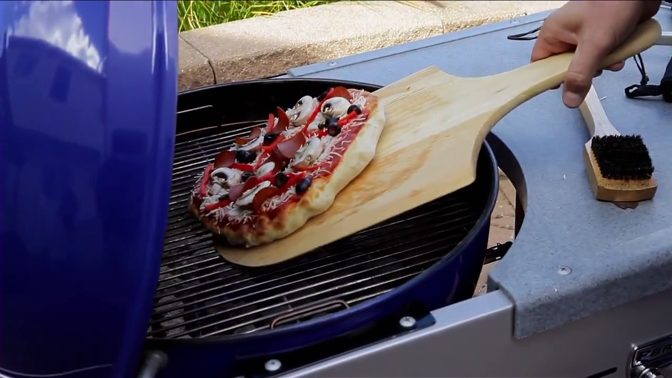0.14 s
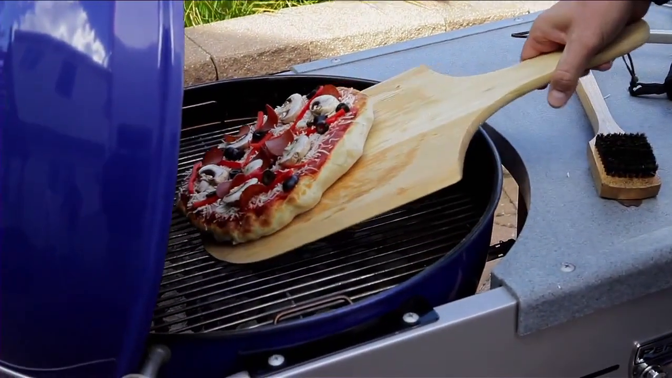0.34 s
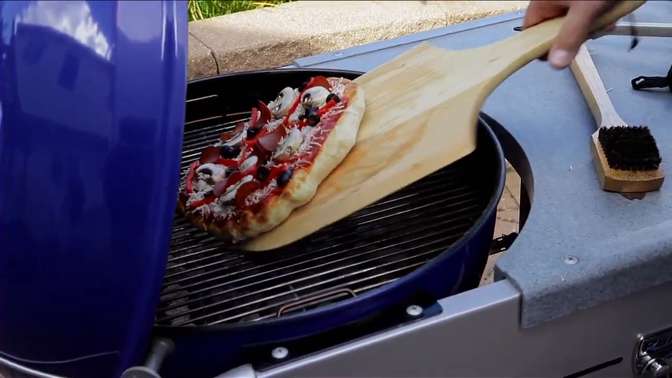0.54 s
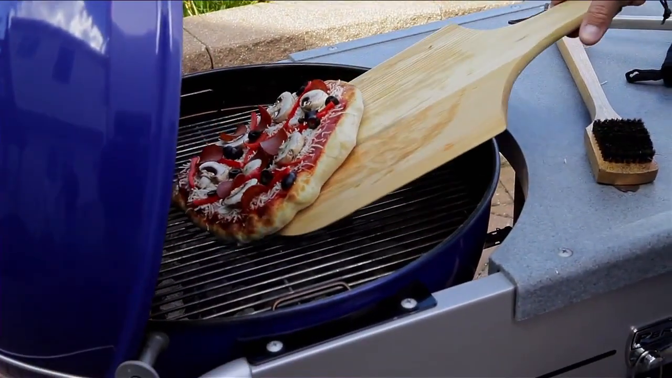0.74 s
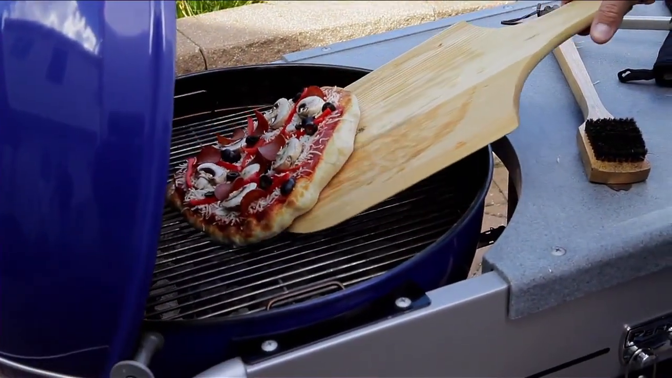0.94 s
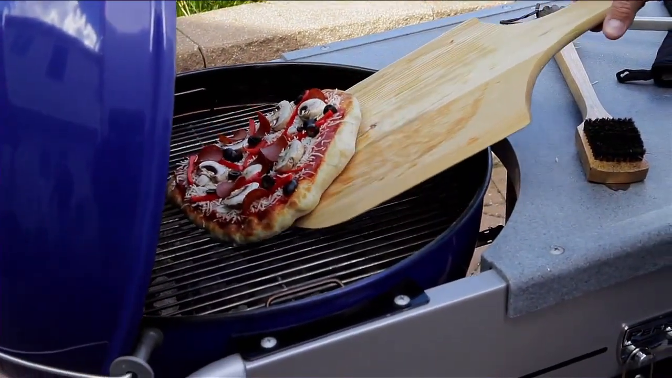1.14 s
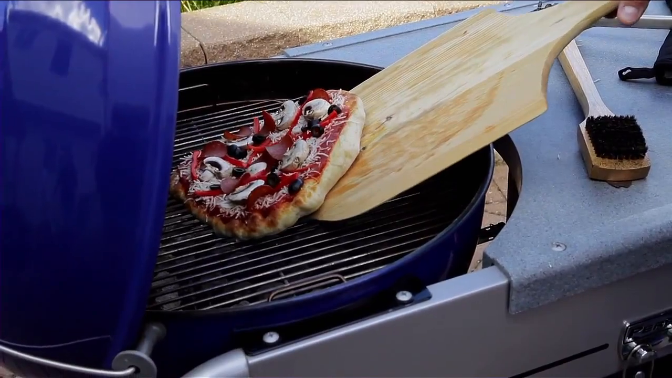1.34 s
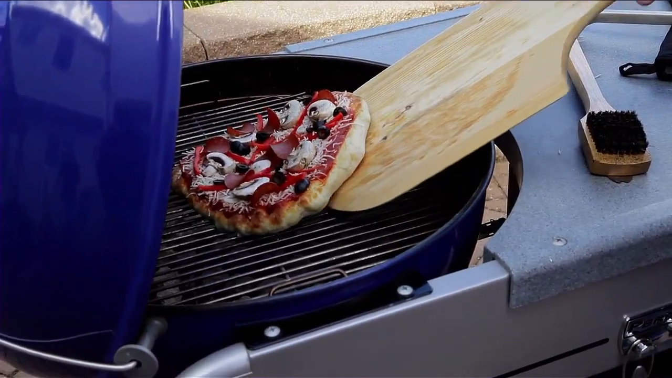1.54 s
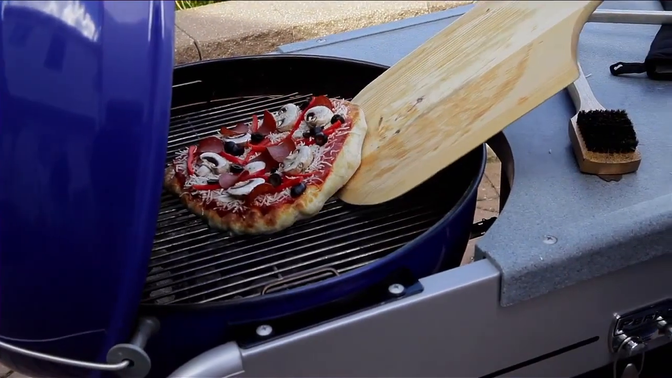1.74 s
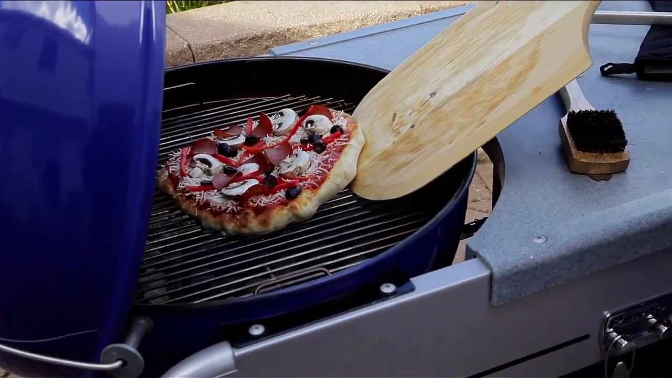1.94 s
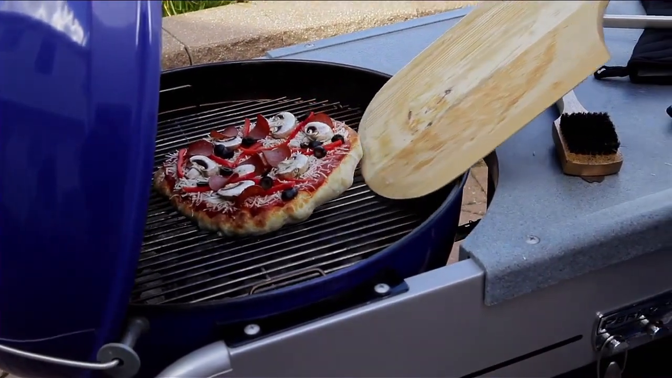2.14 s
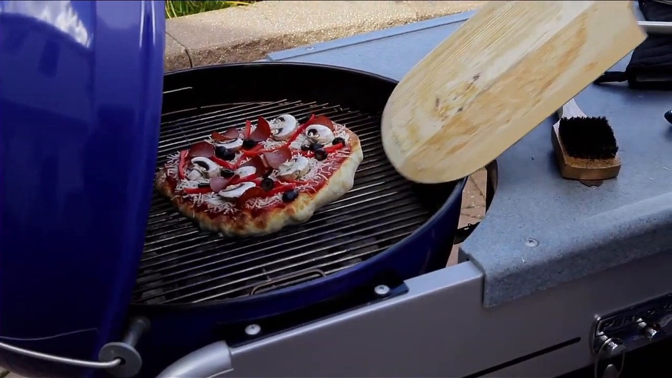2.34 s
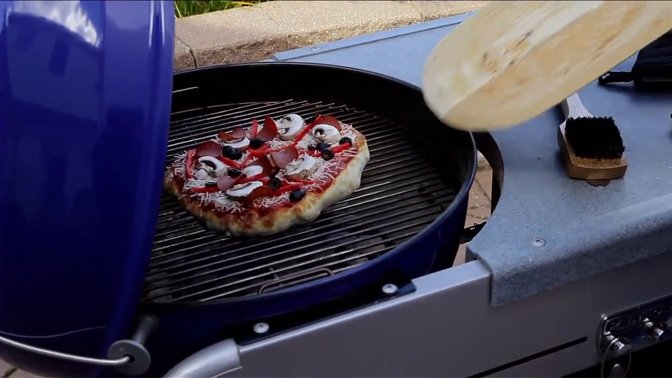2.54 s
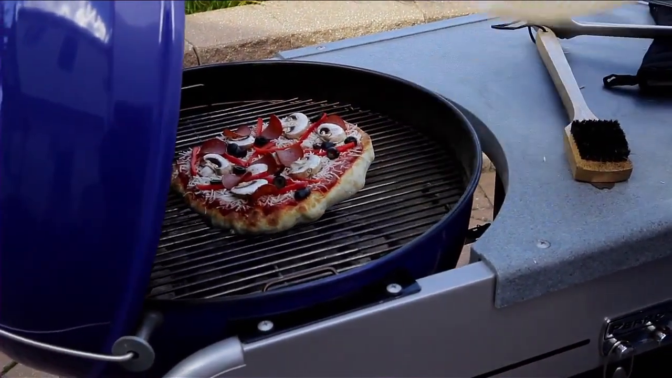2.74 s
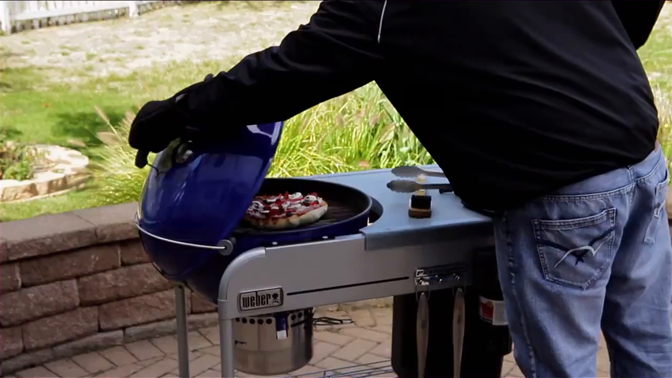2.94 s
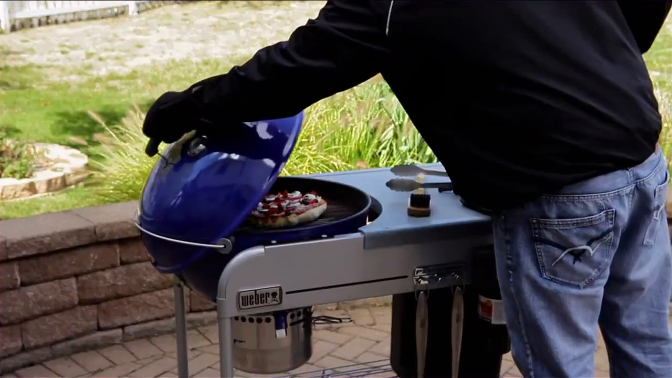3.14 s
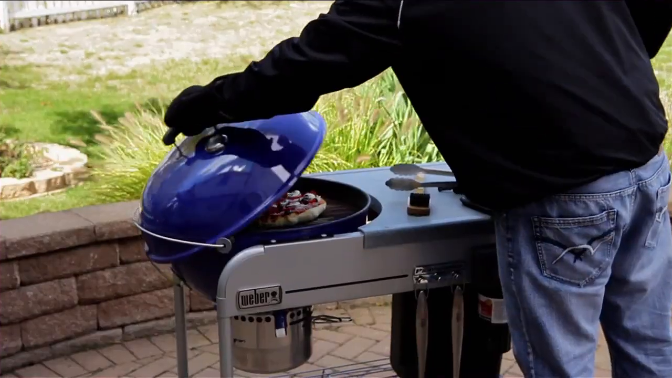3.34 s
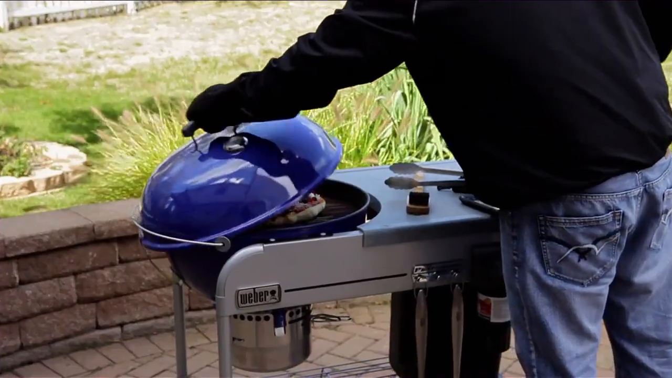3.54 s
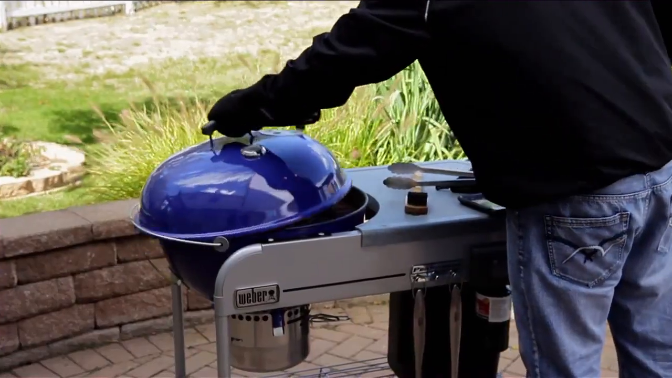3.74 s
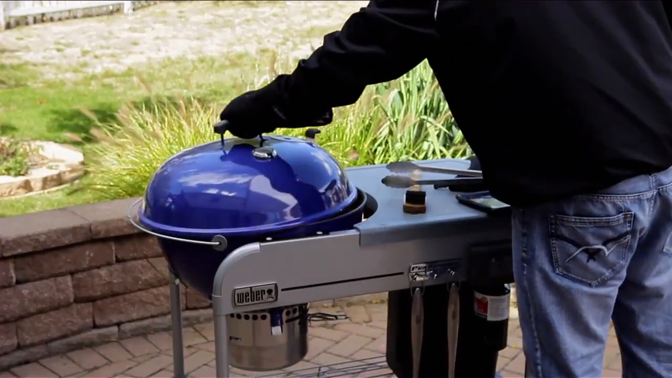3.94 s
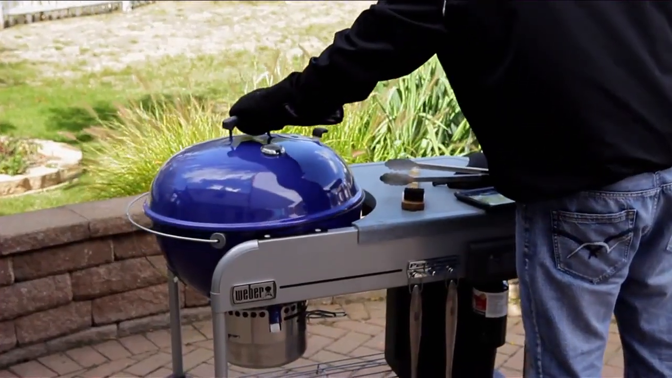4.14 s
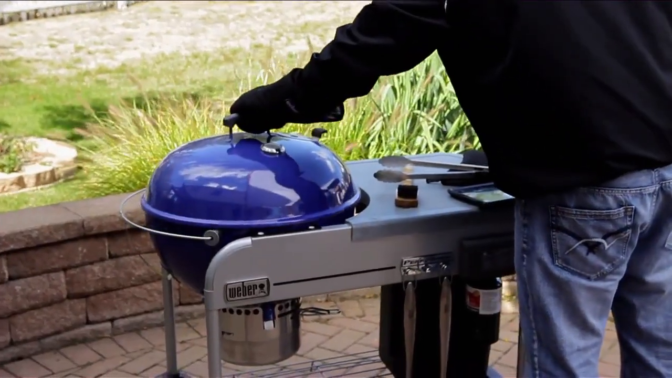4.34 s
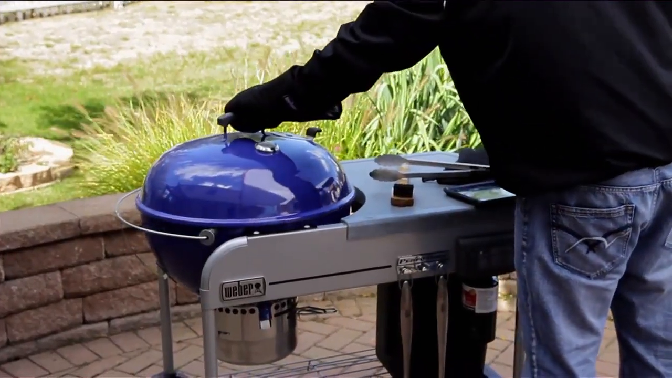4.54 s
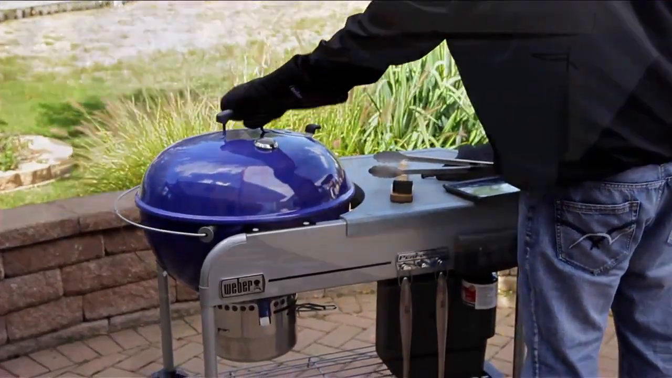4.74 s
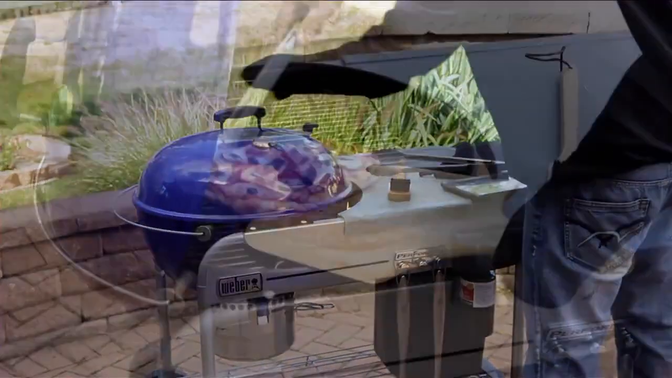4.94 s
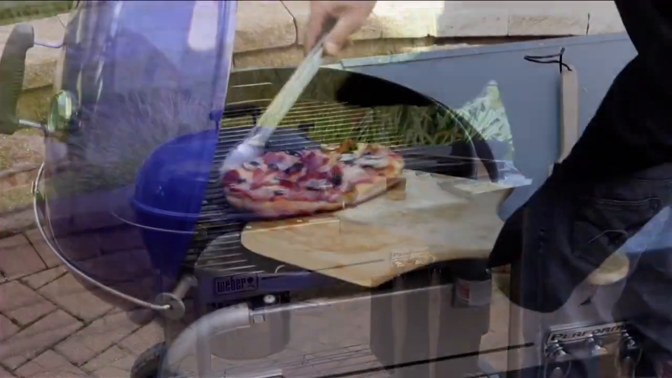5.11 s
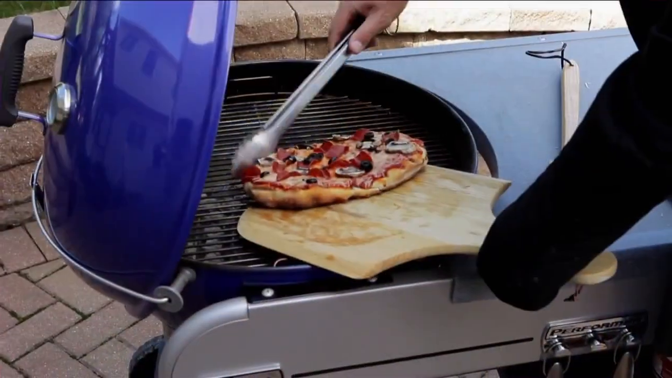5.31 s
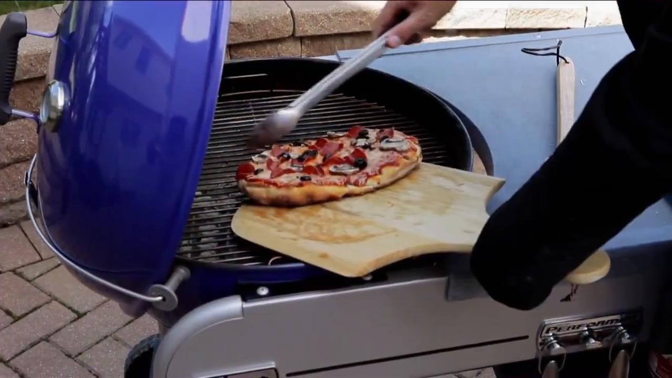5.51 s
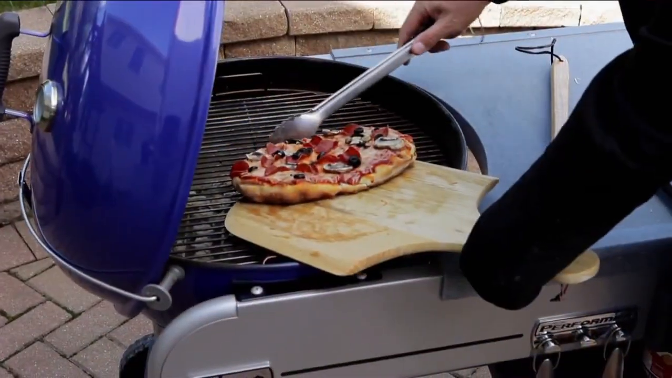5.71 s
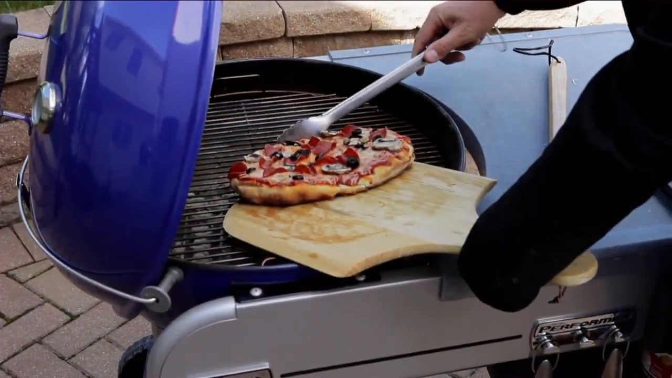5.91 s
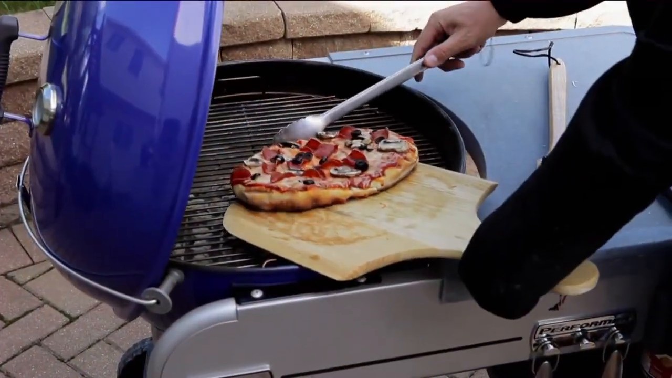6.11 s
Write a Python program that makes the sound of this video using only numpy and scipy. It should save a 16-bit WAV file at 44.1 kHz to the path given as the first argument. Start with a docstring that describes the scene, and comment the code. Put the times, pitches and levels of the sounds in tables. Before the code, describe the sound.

Outdoors on a quiet patio, a soft low wash, faint birds mostly left and a thin insect trill. A wooden peel gives two hollow knocks, dull bumps, then two lighter knocks with a touch of metal. Later a steel grill lid booms and scrapes over its rim, rattles again, and slams shut with a hard, short-ringing clank. The grill is close and dry, to the right; afterwards the air is quieter.

```python
"""Kettle grill on a patio

A wooden peel knocks the grate (hollow decaying sines, clatter noise, metal modes). The enamelled steel lid
slides over the rim (noise touches, ringing modes, swelling low modes) and clanks shut (short air pushes).
The grill stands to the right. Birds whistle (gliding sines), an insect trills (pulsed chirps) and a deep
tone throbs, over a soft outdoor wash of shaped noise that sinks after the lid has shut."""
import sys
import numpy as np
from scipy import signal
from scipy.fft import rfft, irfft, next_fast_len
from scipy.io import wavfile
from scipy.ndimage import map_coordinates

SR = 44100
rng = np.random.default_rng(int(sys.argv[2]) if len(sys.argv) > 2 else 0)


def unload_audio(sound):
    """Save the sound as a 16-bit wav file, at the path given as the first command line argument."""
    columns = np.transpose(np.atleast_2d(sound))
    # keep every value between -1 and 1, then stretch to whole-number steps
    steps = np.round(np.clip(columns, -1, 1) * 32767)
    wavfile.write(sys.argv[1], SR, steps.astype(np.int16))


N = 272097
TIME = np.arange(N) / SR
AFTER = np.arange(SR * 3 // 5) / SR  # seconds after one contact


def amp(db):
    """Decibels to gain."""
    return 10 ** (np.asarray(db) / 20)


def unit(x):
    """Scale to rms 1."""
    return x / np.sqrt(np.mean(x ** 2) + 1e-20)


def along(points, hz):
    """Interpolate (Hz, value) points on a log frequency axis."""
    point_hz, values = np.transpose(points)
    return np.interp(np.log(hz + 1), np.log(point_hz + 1), values)


def filtered(x, response):
    """Multiply the spectrum of x by a response of frequency."""
    n = x.shape[-1]
    padded = next_fast_len(n + SR // 4)
    spectrum = rfft(x, padded) * response(np.fft.rfftfreq(padded, 1 / SR))
    return irfft(spectrum, padded)[..., :n]


def add(track, start_s, sound):
    """Mix a sound into the track at start_s."""
    part = track[..., max(round(start_s * SR), 0):][..., :sound.shape[-1]]
    part += sound[..., :part.shape[-1]]


def wobble(knots_per_s):
    """Smooth random curve through normally distributed knots."""
    knots = rng.standard_normal(int(N * knots_per_s / SR) + 4)
    return map_coordinates(knots, [TIME * knots_per_s])


def noise(spectrum, n):
    """Two unrelated coloured noises, rms 1 together."""
    return unit(filtered(rng.standard_normal((2, n)), lambda hz: amp(along(spectrum, hz))))


def dying(x, t60s):
    """Each frequency of x fades at its own speed."""
    hz, t, z = signal.stft(x, SR, nperseg=256)
    fade = amp(-60 * t / along(t60s, hz)[:, None])
    return signal.istft(z * fade, SR, nperseg=256)[1][:, :x.shape[-1]]


def arch(start_s, length_s):
    """Half-sine swell."""
    return np.sin(np.pi * np.clip((TIME - start_s) / length_s, 0, 1)).clip(0)


# Left channel for a source on the right. Each row: frequency in Hz, gain in dB.
RIGHT_SOURCE_LEFT_DB = [(50, -7.5), (150, -11), (350, -16.5), (700, -11), (1300, -9), (2400, -5.5),
                        (4800, -2.5), (9000, -6), (15000, -7)]
# Likeness of the two channels. Each row: frequency in Hz, correlation (no unit).
RIGHT_SOURCE_CORRELATION = [(50, -0.05), (160, -0.25), (350, -0.16), (700, -0.061), (1500, -.35),
                            (3000, 0.0064), (10000, -0.15)]


def from_right(pair):
    """A source on the right reaches the left weaker and mostly unlike, the bass partly in opposite phase."""
    def left_response(hz):
        alike = along(RIGHT_SOURCE_CORRELATION, hz)
        return amp(along(RIGHT_SOURCE_LEFT_DB, hz)) * np.array([np.sqrt(1 - alike ** 2), alike])
    left = filtered(pair, left_response).sum(axis=0)
    return np.array([left, pair[1]])


# Background levels before the gains. Each row: time in seconds, wash in dB, hiss in dB.
AIR_LEVELS = [(0, -55.5, -64), (2.65, -55, -66), (3.4, -52.5, -67), (4.4, -55.5, -65.5),
              (5.0, -65.5, -66.5), (5.25, -80, -66), (5.8, -80.5, -64.5)]
# Spectrum of wash and rumble. Each row: frequency in Hz, relative density in dB per Hz.
WASH_SPECTRUM = [(15, -31), (25, 5.5), (43, 1.5), (80, 0), (205, -1.5), (371, -5), (780, -8.5), (886, -7.5),
                 (1570, -16.5), (1900, -19), (2070, -20.5), (4000, -26.5), (5200, -28.5), (8800, -120)]
# Spectrum of the hiss. Each row: frequency in Hz, relative density in dB per Hz.
HISS_SPECTRUM = [(20, -41), (40, -7.5), (140, -6), (320, -2.5), (650, -4.5), (1100, -3.5), (2200, -13),
                 (3000, -11.5), (4000, -11.5), (5300, -6), (6500, -5.5), (8100, -8), (11000, -18),
                 (15500, -27)]
# Balance of the hiss. Each row: frequency in Hz, left over right in dB.
HISS_BALANCE = [(100, 3.5), (700, 3.5), (2400, 5), (4400, 1.5), (8000, 2.5), (15000, -2.5)]
RUMBLE_EASES_DB_PER_S = 2  # relative to the wash


def air(rumble_gain_db=9, wash_gain_db=6, hiss_gain_db=3.5, unrest_db=0.87, split_hz=115):
    """Restless rumble and wash from the right, split from one noise, under a smooth hiss from all round."""
    s, *columns = np.transpose(AIR_LEVELS)
    wash_db, hiss_db = [np.interp(TIME, s, column) for column in columns]
    rumble_db = wash_db - RUMBLE_EASES_DB_PER_S * TIME
    both = from_right(noise(WASH_SPECTRUM, N))
    rumble = filtered(both, lambda hz: 1 / (1 + (hz / split_hz) ** 4))
    wash = (both - rumble) * amp(wash_db + wash_gain_db + unrest_db * wobble(6.08))
    rumble = rumble * amp(rumble_db + rumble_gain_db + unrest_db * wobble(15.0))
    halves = np.array([[.5], [-.5]])
    hiss = filtered(noise(HISS_SPECTRUM, N), lambda hz: amp(along(HISS_BALANCE, hz) * halves))
    return rumble + wash + hiss * amp(hiss_db + hiss_gain_db)


# Swells of the deep tone. Each row: start in seconds, length in seconds, right-channel peak in dB.
THROB_SWELLS = [(-.03, 0.2, -34.5), (0.108, 0.176, -38.5), (.257, .26, -32.5), (0.51, 0.15, -37)]
THROB_HZ = 38.1


def throb(left_db=-18):
    """A deep sine swells and fades a few times, mostly on the right."""
    tone = np.zeros(N)
    for s, length_s, db in THROB_SWELLS:
        tone += amp(db) * arch(s, length_s) * np.sin(2 * np.pi * THROB_HZ * (TIME - s))
    return np.array([amp(left_db) * tone, tone])


# Insect trills. Each row: start in seconds, length in seconds, pulses per second, level in dB before +3 dB.
INSECT_TRILLS = [(0.132, 0.58, 80, -56.5), (1.05, 0.35, 88, -66.5), (1.859, 0.56, 95.6, -57),
                 (2.541, 0.92, 90, -66), (4.172, 0.34, 43, -59), (4.93, 0.45, 76, -67),
                 (5.662, 0.635, 80, -56)]


def insect(centre_hz=6130, fall_hz=900, rough=0.03, right_db=-7):
    """Rapid wing strokes, each a tiny falling chirp."""
    out = np.zeros(N)
    for s, length_s, rate, db in INSECT_TRILLS:
        stroke = ((TIME - s) * rate + .06 * wobble(22)) % 1
        hz = (centre_hz + fall_hz * (.5 - stroke)) * (1 + rough * wobble(700))
        level = amp(db + 3) * np.sqrt(arch(s, length_s)) * np.sin(np.pi * stroke) ** 2
        out += level * np.sin(2 * np.pi * np.cumsum(hz) / SR)
    return np.array([out, amp(right_db) * out])


def whistles(shape, calls, pan_db, waver, edge, flutter_db=3):
    """One kind of call: wavering sines (s, length s, pitch factor, dB) that glide along one shape."""
    out, flutter, drift = np.zeros(N), wobble(70), wobble(220)
    share, pitch, level_db = np.transpose(shape)
    for s, length_s, factor, db in calls:
        u = np.linspace(0, 1, int(length_s * SR))
        here = np.minimum(int(s * SR) + np.arange(len(u)), N - 1)
        glide = np.exp(np.interp(u, share, np.log(pitch)))
        hz = factor * glide * (1 + waver * drift[here])
        call_db = db + np.interp(u, share, level_db) + flutter_db * flutter[here]
        level = amp(call_db) * signal.windows.tukey(len(u), edge)
        add(out, s, level * np.sin(2 * np.pi * np.cumsum(hz) / SR))
    return out * amp([[pan_db / 2], [-pan_db / 2]])  # positive pan: left


# Bird levels: call dB plus shape dB, before flutter, pan and distance gains.
# Long climbing whistle. Each row: start in seconds, length in seconds, level in dB.
SWEEP_CALLS = [(1.81, .435, -52.5), (2.70, .375, -52)]
# Its shape. Each row: share of the length, pitch in Hz, level in dB.
SWEEP_GLIDE = [(0, 1892, -14.5), (.5, 3240, -8.5), (.79, 4760, -7), (.9, 5970, 2.5), (1, 6370, -26)]
# Quick downward slur. Each row: start in seconds, level in dB.
SLUR_CALLS = [(1.59, -67), (1.645, -59), (2.499, -61.5)]
# Its shape. Each row: share of the length, pitch in Hz, level in dB.
SLUR_GLIDE = [(0, 3450, -3), (.5, 3020, 0.5), (1, 2080, 0)]
# Thin two-voiced rising whistle. Each row: start in seconds, length in seconds, pitch in Hz, level in dB.
THIN_CALLS = [(2.264, .26, 8870, -61.5), (2.29, .22, 7025, -67.5)]
# Its shape. Each row: share of the length, multiple of the pitch, level in dB.
THIN_GLIDE = [(0, .96, -13), (.65, 1, -1), (.85, 1.015, -2), (1, 1.04, 3.5)]
# Soft low held whistle. Each row: start in seconds, length in seconds, pitch in Hz, level in dB.
LOW_CALLS = [(1.116, 0.108, 1964, -65), (3.28, 0.16, 1915, -62), (3.69, 0.149, 1934, -62.5),
             (4.861, 0.1884, 2205, -71), (4.882, 0.168, 1963, -71), (5.756, 0.091, 2025, -70),
             (5.893, 0.101, 2008, -69)]
# Its shape. Each row: share of the length, multiple of the pitch, level in dB.
LOW_GLIDE = [(0, .92, -1.5), (.35, 1, -4), (.7, 1.01, -5), (1, .97, -5)]
# Short falling chips. Each row: start in seconds, pitch in Hz, level in dB.
CHIP_CALLS = [(.24, 4550, -67.5), (.835, 4300, -68), (1.405, 4350, -65.5), (4.66, 4350, -67),
              (4.918, 4600, -65), (5.078, 4800, -60.5), (5.218, 4650, -67.5), (5.27, 3720, -75)]
# Their shape. Each row: share of the length, multiple of the pitch, level in dB.
CHIP_GLIDE = [(0, 1.09, 0), (.5, 1, 4.5), (1, .86, -12)]
# Arched peeps, low or very high. Each row: start in seconds, pitch in Hz, level in dB.
PEEP_CALLS = [(0.639, 9100, -63), (1.85, 8200, -64), (3.139, 2800, -61), (3.149, 8400, -63),
              (3.54, 3100, -59.5), (4.326, 3050, -54.5), (5.108, 4950, -64), (5.329, 8250, -62.5),
              (5.46, 4800, -68), (5.66, 2900, -66), (5.825, 2650, -68)]
# Their shape. Each row: share of the length, multiple of the pitch, level in dB.
PEEP_GLIDE = [(0, .85, -6.5), (.35, 0.92, -1.5), (.65, 1, -0.5), (1, 0.96, -14)]
SLUR_S, CHIP_S, PEEP_S = .062, 0.053, 0.035  # call lengths


def birds():
    """Six kinds of gliding whistle, each at its own place, mostly to the left."""
    sweeps = [(s, length_s, 1, db) for s, length_s, db in SWEEP_CALLS]
    slurs = [(s, SLUR_S, 1, db) for s, db in SLUR_CALLS]
    chips = [(s, CHIP_S, hz, db) for s, hz, db in CHIP_CALLS]
    peeps = [(s, PEEP_S, hz, db) for s, hz, db in PEEP_CALLS]
    return (whistles(SWEEP_GLIDE, sweeps, pan_db=8.5, waver=0.0058, edge=0.13)
            + whistles(SLUR_GLIDE, slurs, pan_db=10, waver=0.0058, edge=0.24)
            + whistles(THIN_GLIDE, THIN_CALLS, pan_db=8, waver=.005, edge=0.135)
            + whistles(LOW_GLIDE, LOW_CALLS, pan_db=16, waver=0.0225, edge=0.206)
            + whistles(CHIP_GLIDE, chips, pan_db=0.5, waver=0.006, edge=0.43)
            + whistles(PEEP_GLIDE, peeps, pan_db=14, waver=0.022, edge=0.71))


# Decay of the yard's scatter. Each row: frequency in Hz, t60 in seconds.
YARD_T60 = [(500, 0.37), (3000, 0.42), (10000, 0.45)]


def yard(x):
    """Walls and trees scatter a far sound: convolution with decaying noise."""
    tail = dying(rng.standard_normal((2, SR // 2)), YARD_T60)
    return signal.fftconvolve(x, tail / np.linalg.norm(tail[0]), axes=1)[:, :N]


def ring_outs(modes):
    """One fading complex tone for each mode (Hz, dB, t60 s)."""
    hz, level_db, t60 = np.transpose(modes)[:, :, None]
    return amp(level_db) * np.exp((2j * np.pi * hz - np.log(1000) / t60) * AFTER)


def struck(tones, blow_db, scatter_db):
    """A strike sums the tones twice, each at a chance strength and phase."""
    strength = amp(blow_db + scatter_db * rng.standard_normal((2, len(tones))))
    phase = np.exp(2j * np.pi * rng.random(strength.shape))
    return ((strength * phase) @ tones).real


def wood_note(hz, rise_s, t60):
    """One mode that swells and rings out, on the right."""
    level = np.minimum(AFTER / rise_s, 1) * amp(-60 * np.maximum(AFTER - rise_s, 0) / t60)
    return level * np.sin(2 * np.pi * hz * AFTER) * np.array([[0], [1]])


# Peel on grate and table. Each row: start in seconds, note in dB, rise in seconds, note pitch in Hz,
# note t60 in seconds, clatter in dB, metal in dB.
PEEL_KNOCKS = [(.856, -32, 0.0179, 572, 0.096, -43.5, -78.5), (.974, -38.5, 0.00085, 573, 0.25, -38, -69),
               (2.845, -39.5, 0.0033, 729, 0.19, -44, -48), (2.92, -45, 0.0071, 318, 0.079, -44, -59)]
# Soft bumps of the peel. Each row: start in seconds, pitch in Hz, level in dB.
PEEL_THUDS = [(2.05, 72, -39.5), (2.201, 154, -43.5), (2.278, 115.2, -42.5), (2.829, 77.8, -38.5)]
# Spectrum of the wooden clatter. Each row: frequency in Hz, relative density in dB per Hz.
WOOD_SPECTRUM = [(50, -11), (120, 13), (380, 14), (900, 5.5), (1600, -5.5), (2800, -12), (6000, -31),
                 (14000, -45)]
# Modes of the struck metal. Each row: frequency in Hz, relative level in dB, t60 in seconds.
METAL_MODES = [(890, -8, .1), (1120, 5.5, 0.218), (1358, -1, 0.2), (2140, 2, .1), (2730, -3, .09),
               (2884, -1, 0.092), (3380, 4, 0.085), (5290, -4.5, .06), (6193, -5, 0.065)]
THUD_RISE_S, THUD_T60_S = 0.006, 0.166


def peel(clatter_t60=0.24):
    """The wooden peel knocks with a hollow note, dull clatter and a little metal; soft bumps only thud."""
    out, metal = np.zeros((2, N)), ring_outs(METAL_MODES)
    for s, db, rise_s, hz, t60, clatter_db, metal_db in PEEL_KNOCKS:
        clatter = amp(clatter_db - 60 * AFTER / clatter_t60) * noise(WOOD_SPECTRUM, len(AFTER))
        note = amp(db) * wood_note(hz, rise_s, t60)
        add(out, s, note + clatter + struck(metal, metal_db, scatter_db=1.0))
    for s, hz, db in PEEL_THUDS:
        add(out, s, amp(db) * wood_note(hz, THUD_RISE_S, THUD_T60_S))
    return from_right(out)


# Dense plate modes. Each row: frequency in Hz, relative density in dB per Hz.
RING_SPECTRUM = [(400, -49), (1100, -0.5), (1370, -2.5), (1650, 3.5), (2080, 1.5), (2550, -4), (3000, 2),
                 (3600, -9), (5000, -26.5), (9000, -60)]
# Decay of the steel. Each row: frequency in Hz, t60 in seconds.
STEEL_DECAY = [(100, 0.85), (400, 0.226), (1000, 0.27), (2000, 0.46), (3000, 0.28), (5500, 0.22),
               (12000, 0.19)]


def plate_modes(count=90, spread_db=2):
    """A thin shell has crowded, almost evenly spaced modes; their total rms is 1."""
    hz = np.linspace(900, 4200, count) + rng.uniform(-16, 16, count)
    level_db = along(RING_SPECTRUM, hz) + spread_db * rng.standard_normal(count)
    level_db -= 20 * np.log10(np.linalg.norm(amp(level_db)) / np.sqrt(2))
    return np.column_stack([hz, level_db, along(STEEL_DECAY, hz)])


# Lid meets bowl and skids. Each row: start in seconds, number of touches, first gap in seconds, clank in dB,
# clank centre in Hz, ring in dB, scrape in dB, change per touch in dB.
LID_BLOWS = [(3.921, 4, 0.004, -30.5, 443, -36, -38.5, 0.77),
             (4.0446, 4, 0.00484, -30, 400, -37.5, -40, -.5), (4.166, 1, .01, -33, 1154, -47.5, -56.5, 0),
             (4.1735, 3, .0042, -28, 980, -37, -39, -2.5), (4.3943, 1, .01, -33.5, 450, -48.5, -53.5, 0),
             (4.4204, 2, .023, -37, 560, -56.5, -64.5, -3.5), (4.460, 6, 0.003, -23.5, 700, -32, -37, -2.5)]
# Ringing modes of lid and bowl. Each row: frequency in Hz before the shift, relative level in dB,
# t60 in seconds before seating.
SHELL_MODES = [(430, -2.5, 0.13), (574, -1.5, 0.163), (718, -4, 0.21), (845, -3, 0.14), (857, -4.5, 0.33),
               (1057, -7.5, 0.19), (1015, -10, .25), (1134.9, -4.5, 0.29), (1245, -15, 0.24),
               (1620, -5, 0.65), (1693, -5.5, 0.31), (1810, -11.5, 0.28), (2000, -12, 0.28),
               (2013, 0, 0.22), (2094, 4, .3), (2094, -4, 0.51), (2310, -11, 0.25), (2900, -7, 0.37),
               (2970, -7, 0.3), (3150, -10.5, 0.31)]
# Clank spectrum. Each row: multiple of the clank centre, relative density in dB per Hz.
CLANK_SPECTRUM = [(.05, -52), (.25, -14.5), (.55, 0), (.85, 4), (1.15, -2), (1.8, -8.5), (2.7, -24),
                  (5, -35), (12, -83.5)]
# Scrape spectrum. Each row: frequency in Hz, relative density in dB per Hz.
SCRAPE_SPECTRUM = [(1200, -37.5), (3000, -1.5), (4200, -2), (5600, 1), (7200, -11), (10000, -10),
                   (13000, -16), (16000, -29.5)]
# Contact point travelling round the rim. Each row: time in seconds, lift of the left channel in dB.
RIM_LEFT_LIFT = [(3.92, 1.5), (4.19, 2.5), (4.42, -0.5), (4.46, 6.5), (4.55, 4.5)]
SCRAPE_LOSS_DB_PER_S = 110  # the scrape dies as the skid slows
SEATED_S, SEATED_DAMPING_DB_PER_S = 4.39, 47  # once it sits on the bowl, the lid rings shorter
MODE_SHIFT = .006  # random share per blow, for the place where the rims meet


def lid_contacts(mode_db=-13, rise_s=0.001, scatter_db=2.5, tick_db=6, tick_t60=0.0025):
    """Slowing skids: touch k comes k squared gaps after the first, ticks, and rings the steel afresh."""
    out = np.zeros((2, N))
    for s, count, gap_s, clank_db, clank_hz, ring_db, scrape_db, step_db in LID_BLOWS:
        modes = np.array(SHELL_MODES)
        modes[:, 0] *= 1 + MODE_SHIFT * rng.standard_normal(len(modes))
        shell, plate = ring_outs(modes), ring_outs(plate_modes())
        # the weight of the blow feeds the low modes, its hardness the high ones
        blow_db = along([(1200, clank_db), (1600, ring_db + 2.5)], modes[:, 0])
        damping = amp(-SEATED_DAMPING_DB_PER_S * AFTER * (s > SEATED_S))
        clank_spectrum = np.array(CLANK_SPECTRUM) * [clank_hz, 1]
        for k in range(round(count)):
            since_s = gap_s * k ** 2
            clank = amp(clank_db) * noise(clank_spectrum, len(AFTER))
            scrape = amp(scrape_db - SCRAPE_LOSS_DB_PER_S * since_s) * noise(SCRAPE_SPECTRUM, len(AFTER))
            scrape = scrape * (1 + amp(tick_db - 60 * AFTER / tick_t60))
            ring = struck(shell, blow_db + mode_db, scatter_db) + struck(plate, ring_db, scatter_db)
            touch = dying(clank + scrape, STEEL_DECAY) + damping * ring
            add(out, s + since_s, amp(step_db * k) * touch * (1 - np.exp(-AFTER / rise_s)))
    left, right = from_right(out)
    return np.array([left * amp(np.interp(TIME, *np.transpose(RIM_LEFT_LIFT))), right])


# Sliding rim flexes the dome. Each row: time of the peak in seconds, Gaussian width in seconds, level in dB.
DOME_FLEXES = [(3.932, 0.0052, -12.5), (3.9434, 0.0051, -11.5), (3.958, 0.0059, -31), (4.046, 0.0053, -17),
               (4.069, 0.014, -12.5), (4.122, .010, -25), (4.199, 0.016, -23.5), (4.398, 0.0018, -30.5),
               (4.464, 0.0022, -23)]
# Low modes of the dome. Each row: frequency in Hz, relative level in dB, t60 in seconds.
DOME_MODES = [(127.4, -20.5, 0.94), (152.33, -12.5, 0.42), (173.9, -12.5, 0.27), (191.4, 2.5, 0.082),
              (214.9, -3.5, 0.092), (273, 1, 0.1), (289.8, -11, 0.14), (341, -8, 0.084), (458.9, -9, 0.4)]


def lid_boom(left_db=-12, lead_s=0.035):
    """The dome's low modes swell while the rim pushes them, then ring out; left is in opposite phase."""
    out, t = np.zeros(N), AFTER - lead_s
    for s, width_s, db in DOME_FLEXES:
        push = np.exp(-.5 * (t / width_s) ** 2)
        for hz, mode_db, t60 in DOME_MODES:
            decay_per_sample = amp(-60 / (t60 * SR))
            swell = signal.lfilter([1], [1, -decay_per_sample], push / push.sum())
            add(out, s - lead_s, amp(db + mode_db) * swell * np.cos(2 * np.pi * hz * t))
    return np.array([-amp(left_db) * out, out])


# Lid lands flat and pushes air. Each row: time in seconds, right-channel envelope peak in dB, frequency in Hz,
# Gaussian width in seconds.
AIR_SLAMS = [(4.3964, -17, 346, 0.0011), (4.4232, -26.5, 687, 0.00053), (4.444, -33, 600, 0.00079),
             (4.456, -19.5, 520, 0.00053), (4.4612, -3.5, 574, 0.00035), (4.4637, 0, 508, 0.0011)]


def lid_slam(left_db=-9, left_lead_s=0.000238):
    """Landing flat, the lid squeezes out short pushes of air; left is earlier and in opposite phase."""
    out = np.zeros((2, N))
    for s, db, hz, width_s in AIR_SLAMS:
        t = TIME - s + np.array([[left_lead_s], [0]])
        out += amp(db) * np.sin(2 * np.pi * hz * t) * np.exp(-.5 * (t / width_s) ** 2)
    return out * np.array([[amp(left_db)], [-1]])


def scene(bird_db=-2, wall_db=-5, wall_delay_s=.027, bird_echo_db=-3, insect_echo_db=-8):
    """The near grill is dry; birds get a wall's echo, and birds and insect the yard's scatter."""
    song, trill = birds(), insect()
    song = song + amp(wall_db) * filtered(song, lambda hz: np.exp(-2j * np.pi * hz * wall_delay_s))
    scatter = yard(amp(bird_echo_db) * song + amp(insect_echo_db) * trill)
    far = amp(bird_db) * song + trill + scatter
    return air() + throb() + far + peel() + lid_contacts() + lid_boom() + lid_slam()


TOP_HZ = 15720


def record(dry):
    """Clip at full scale, then remove everything from the band limit up."""
    return filtered(np.clip(dry, -1, 1), lambda hz: hz < TOP_HZ)


dry = scene()
out = record(dry)
unload_audio(out)
```